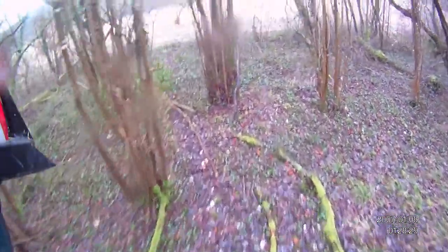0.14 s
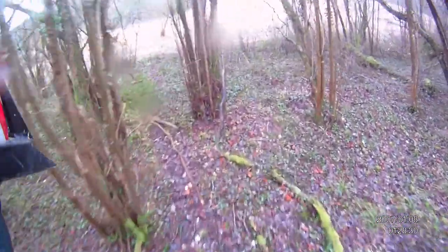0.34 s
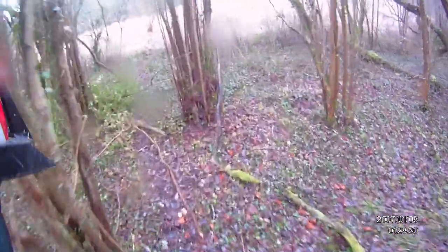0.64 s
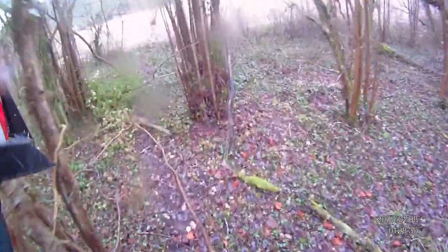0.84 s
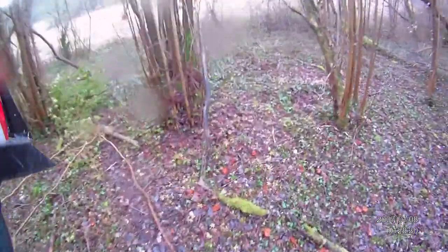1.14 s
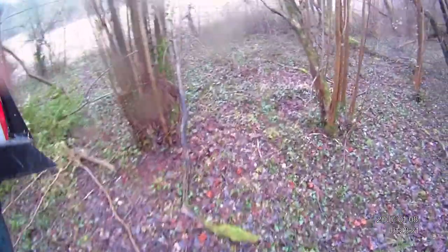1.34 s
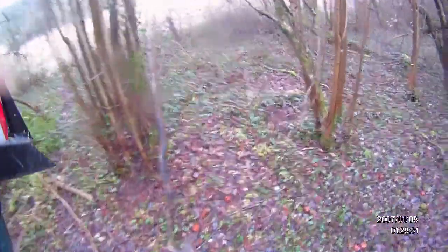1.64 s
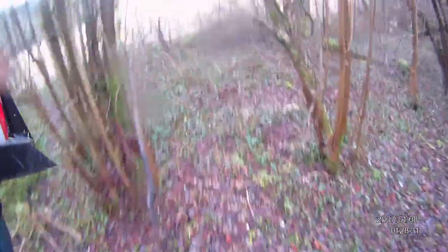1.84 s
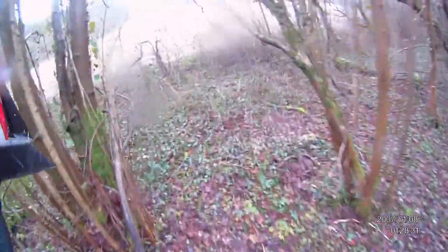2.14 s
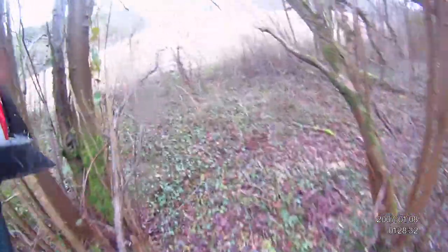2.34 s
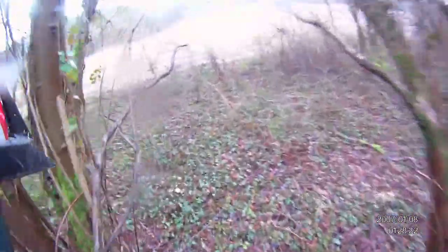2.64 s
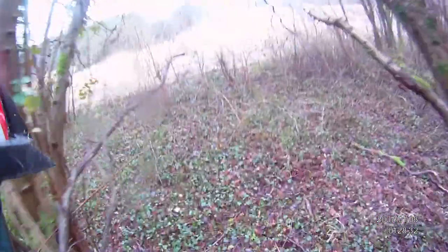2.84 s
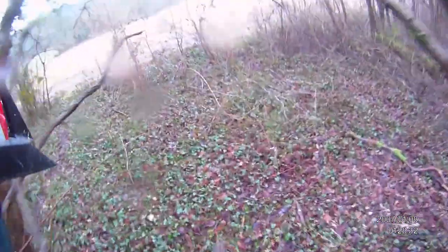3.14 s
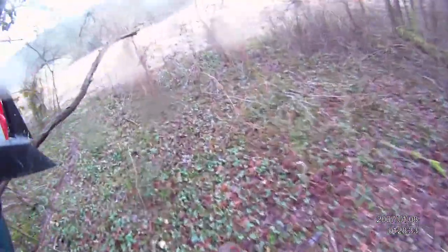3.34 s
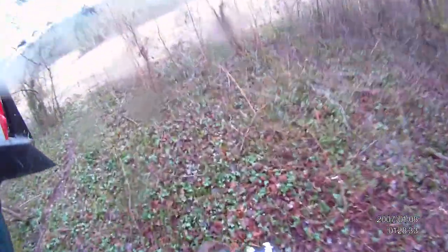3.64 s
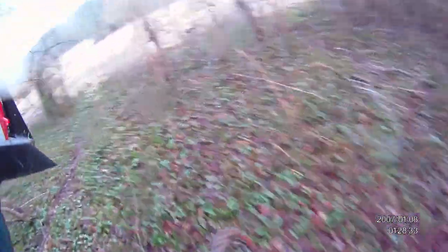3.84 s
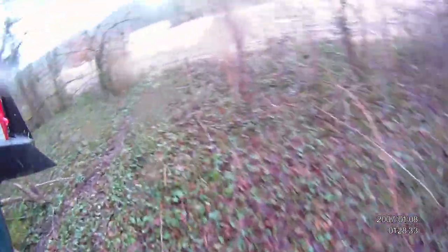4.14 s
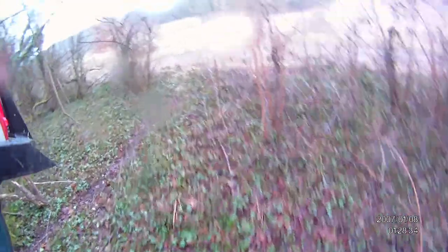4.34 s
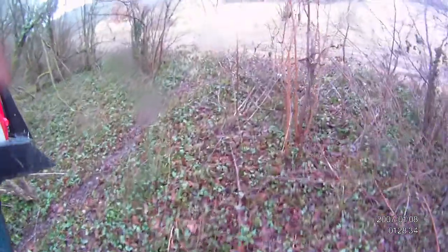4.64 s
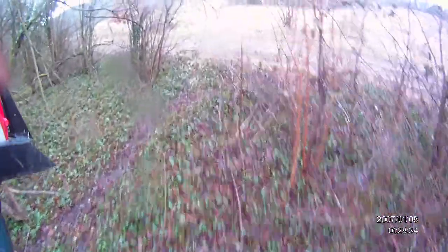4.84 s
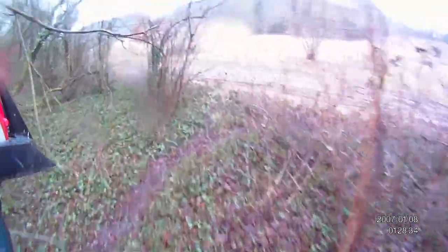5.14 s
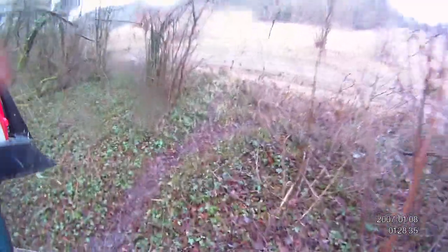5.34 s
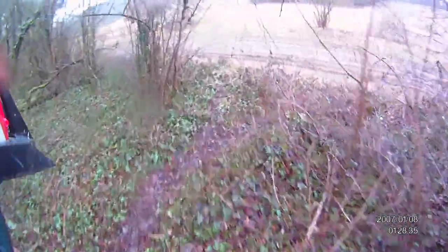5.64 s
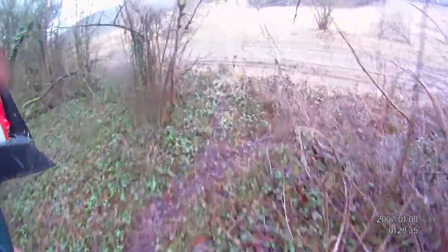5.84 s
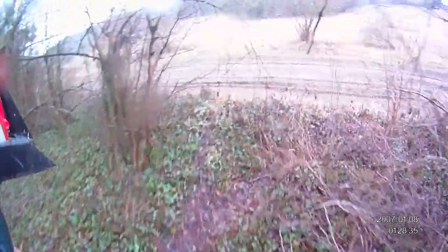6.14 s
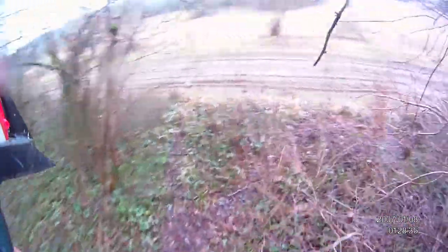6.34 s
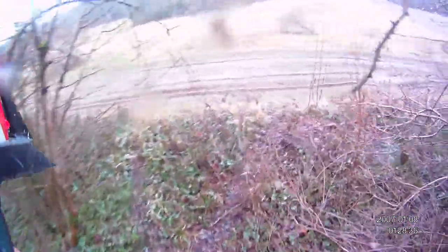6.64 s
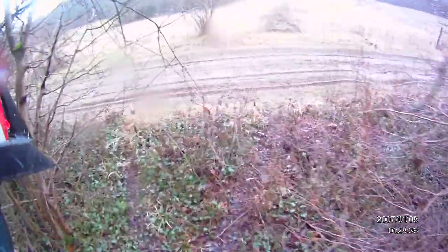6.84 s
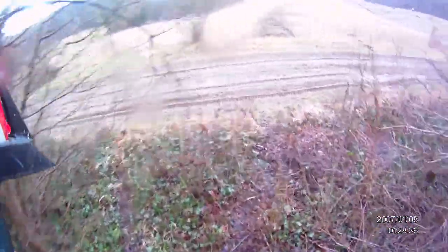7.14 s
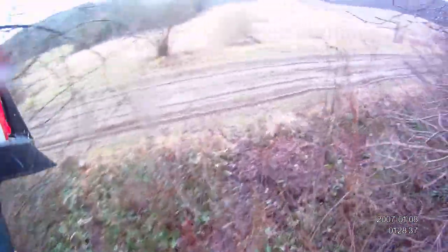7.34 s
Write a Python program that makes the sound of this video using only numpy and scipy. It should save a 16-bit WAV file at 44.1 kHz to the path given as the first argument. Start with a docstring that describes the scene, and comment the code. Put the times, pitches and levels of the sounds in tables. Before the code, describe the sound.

Close and boxy, from a microphone sealed in a small case on a bike: tyres rustle over leaf litter, brittle twigs crack and stems thump the bike. Isolated snaps come first, then a dense bustle of cracking and knocking between roughly two and a half and five and a half seconds, including hard taps on the case. It eases into softer rustling with a few last ticks, with low hiss beneath.

```python
"""Slow bicycle ride through dry brush

A bicycle is ridden slowly through dry woodland brush, heard from a small camera in a closed housing.
Leaves rustle under the tyres as random grains; twigs crack brightly and stems thump the bike as short volleys
of breaking fibres through resonances. A branch raps the housing and jolts ring the frame as decaying modes.
The housing colours rustle, cracks and thumps with a cavity ring and a port ring; hiss and faint whines lie below."""
import sys
import numpy as np
from scipy import signal
from scipy.fft import rfft, irfft
from scipy.io import wavfile

SR = 44100
rng = np.random.default_rng(int(sys.argv[2]) if len(sys.argv) > 2 else 0)


def decibels_to_gain(level_db):
    """Convert a level in decibels to a linear amplitude gain (20 dB per decade)."""
    exponent = np.asarray(level_db, float) / 20
    return 10 ** exponent


def digitize_waveform(pressure):
    """Quantize a signal to 16-bit integers and store it at the path in sys.argv[1].

    Rows of a 2-D input are taken as channels; values are limited to [-1, 1].
    """
    field = np.atleast_2d(pressure).T
    bounded = np.clip(field, -1, 1)
    quanta = np.round(bounded * 32767).astype(np.int16)
    wavfile.write(sys.argv[1], SR, quanta)


N = 330750

# louder twigs cracking close by: t/s, level of the ring's peak/dB, f of the crack/Hz, t60/s,
# level of the dry edge near 10 kHz relative to the ring/dB
TWIG_CRACKS = [(0.0383, -28.5, 4600, 0.0062, -32.5), (0.6917, -6.5, 4420, 0.01, -15),
               (0.8607, -31.5, 3250, 0.012, -23.5), (1.094, -26, 6900, 0.026, -27),
               (1.106, -36, 3310, 0.012, -28), (1.1243, -26.5, 3170, 0.012, -25),
               (1.1407, -29.5, 4740, 0.012, -26), (1.173, -34, 3270, 0.01, -22),
               (1.2068, -28, 5200, 0.0098, -24), (1.3319, -29, 5430, 0.015, -25),
               (1.385, -31, 5870, 0.012, -16), (1.4144, -31.5, 5770, 0.012, -7),
               (1.4265, -26.5, 3520, 0.0098, -31), (1.473, -29, 5150, 0.013, -30),
               (1.8802, -11, 5700, 0.0092, -19.5), (2.1889, -26.5, 4740, 0.0078, -35.5),
               (2.251, -25.5, 4600, 0.0091, -38), (2.3366, -20.5, 6860, 0.015, -20),
               (2.3504, -27, 5100, 0.012, -21), (2.3646, -21.5, 5400, 0.015, -23),
               (2.377, -26, 5840, 0.014, -22.5), (2.4592, -29.5, 5100, 0.015, -23),
               (2.5366, -29, 5400, 0.0091, -29.5), (2.588, -15, 5600, 0.019, -35.5),
               (2.6416, -25.5, 5900, 0.011, -24), (2.7411, -24.5, 5660, 0.01, -16.5),
               (2.7504, -7.5, 6100, 0.017, -40), (2.807, -24, 5540, 0.009, -25.5),
               (2.8634, -10.5, 6240, 0.02, -19.5), (2.9883, -16, 6870, 0.017, -17.5),
               (3.021, -28.5, 5830, 0.018, -26), (3.0312, -22, 5200, 0.011, -25),
               (3.0554, -24.5, 5730, 0.024, -27), (3.1157, -24, 4440, 0.015, -26.5),
               (3.1272, -14.5, 5670, 0.036, -38), (3.3155, -28, 4560, 0.011, -27),
               (3.3903, -31, 5020, 0.011, -30), (3.434, -28, 5770, 0.015, -15),
               (3.456, -28.5, 5750, 0.012, -22), (3.468, -20.5, 6600, 0.025, -17.5),
               (3.5917, -19, 5830, 0.015, -16), (3.685, -18.5, 5830, 0.036, -30),
               (3.7906, -22, 5240, 0.015, -18), (3.8222, -27.5, 5840, 0.017, -12.5),
               (3.87, -23.5, 6030, 0.012, -16.5), (3.92, -23.5, 4730, 0.012, -24),
               (4.0283, -17.5, 5350, 0.012, -16.5), (4.0443, -14.5, 3680, 0.017, -16.5),
               (4.0495, -15.5, 6100, 0.019, -17.5), (4.0947, -23, 5530, 0.022, -29),
               (4.1919, -14, 7550, 0.012, -24.5), (4.2043, -16.5, 5450, 0.011, -21),
               (4.2395, -17.5, 5800, 0.021, -18), (4.252, -22, 3710, 0.021, -22.5),
               (4.263, -15, 5400, 0.022, -24), (4.2722, -14, 5860, 0.036, -22),
               (4.4556, -28, 4570, 0.012, -24), (4.4743, -23.5, 6640, 0.008, -23),
               (4.6307, -15, 5380, 0.011, -21), (4.7353, -17, 6170, 0.0097, -10.5),
               (4.74, -21, 4880, 0.01, -20), (4.757, -24, 4850, 0.022, -23),
               (4.9015, -16, 3900, 0.012, -38), (4.9068, -19.5, 3000, 0.01, -20),
               (5.021, -11.5, 5900, 0.012, -33), (5.0242, -16.5, 3430, 0.012, -22),
               (5.0408, -16.5, 6300, 0.011, -14), (5.0985, -13.5, 5900, 0.016, -10.5),
               (5.1764, -21.5, 5100, 0.014, -20), (5.197, -25, 5840, 0.0088, -8),
               (5.328, -25, 5500, 0.015, -31), (5.3824, -16, 4400, 0.014, -27),
               (5.4085, -27.5, 4470, 0.012, -28.5), (5.5174, -31, 4600, 0.029, -11.5),
               (5.5552, -21.5, 5260, 0.018, -12.5), (5.615, -28.5, 3580, 0.023, -20),
               (5.668, -25, 5970, 0.012, -30), (5.8984, -28.5, 5100, 0.016, -27),
               (5.9883, -28, 4500, 0.013, -18), (6.0197, -17, 4420, 0.01, -28.5),
               (6.1227, -17.5, 4960, 0.008, -20.5), (6.2235, -26, 4880, 0.014, -18),
               (6.8324, -34, 5360, 0.036, -8.5), (6.8842, -23, 7060, 0.0092, -27.5),
               (7.3543, -27.5, 5910, 0.02, -26)]
# louder stems thumping the bike: t/s, level of the ring's peak/dB, f of the stem/Hz,
# level of the body under 900 Hz relative to the ring/dB
STEM_THUMPS = [(0.218, -32.5, 1480, -25), (0.404, -36, 1330, -28), (0.691, -23, 1430, -22),
               (0.729, -33, 1240, -24), (0.76, -30.5, 1290, -25), (0.862, -27, 1170, -19.5),
               (1.094, -25, 3030, -34), (1.1, -29, 1360, -20), (1.159, -31, 2700, -25),
               (1.168, -33, 3180, -36), (1.386, -32.5, 1320, -35), (1.427, -36.5, 1470, -29),
               (1.473, -33, 1300, -21), (1.663, -30, 1410, -19.5), (1.701, -27.5, 1340, -20),
               (1.879, -27, 1200, -19.5), (1.992, -33.5, 1250, -37), (2.251, -26.5, 1280, -39),
               (2.375, -26.5, 2010, -30), (2.491, -31.5, 2040, -34), (2.586, -32.5, 1320, -36),
               (2.742, -34, 3200, -14.5), (2.751, -17.5, 1360, -31.5), (2.773, -35.5, 1390, -27),
               (2.864, -26.5, 1060, -33), (2.883, -30.5, 2030, -24.5), (2.988, -24, 1210, -19.5),
               (3.055, -29, 1720, -21), (3.116, -27, 1700, -16.5), (3.128, -25, 3200, -6),
               (3.136, -23.5, 1220, -31.5), (3.212, -34, 1250, -22.5), (3.266, -36, 2760, -22.5),
               (3.392, -39, 1340, -19), (3.433, -33.5, 1410, -12), (3.448, -27, 1200, -17),
               (3.455, -24, 1170, -28), (3.463, -27, 1840, -23.5), (3.591, -29, 1390, -22.5),
               (3.686, -21.5, 1200, -23), (3.713, -31, 1220, -22.5), (3.869, -30, 1290, -33),
               (3.885, -30, 1320, -37), (3.987, -28, 1350, -30), (4.049, -20.5, 2200, -25),
               (4.096, -20, 1530, -23), (4.202, -23.5, 1320, -27), (4.239, -24, 1260, -18.5),
               (4.255, -17.5, 1320, -22.5), (4.275, -21.5, 1250, -28.5), (4.296, -23, 1460, -22),
               (4.439, -25.5, 1350, -37.5), (4.455, -29, 2300, -30.5), (4.605, -29, 1300, -25),
               (4.63, -24, 1260, -21), (5.175, -24, 1160, -22), (5.329, -32, 1280, -26.5),
               (5.383, -25.5, 3000, -42), (5.668, -24.5, 1280, -34), (5.769, -40, 1200, -12.5),
               (6.123, -23.5, 970, -24), (6.223, -33.5, 1280, -32), (6.812, -32.5, 1720, -30.5),
               (6.942, -30.5, 1270, -15), (7.016, -33, 1280, -22), (7.191, -33, 1270, -39),
               (7.198, -28, 2350, -38), (7.388, -34, 1360, -24)]


def rms_one(x):
    """Scaled to rms 1."""
    return x / np.sqrt(np.mean(x ** 2) + 1e-20)


def peak_one(x):
    """Scaled to peak 1."""
    return x / (np.max(np.abs(x)) + 1e-12)


def band(x, low_hz, high_hz):
    """Butterworth band-pass."""
    return signal.sosfilt(signal.butter(2, [low_hz, high_hz], "band", fs=SR, output="sos"), x)


def resonance(x, hz, width_hz):
    """Two-pole resonance, gain about 1 at its top."""
    r = np.exp(-np.pi * width_hz / SR)
    top = (1 - r * r) / 2
    return signal.lfilter([top, 0, -top], [1, -2 * r * np.cos(2 * np.pi * hz / SR), r * r], x)


def mode(blows, hz, t60):
    """A ringing mode: a unit click starts a decaying sine of height 1."""
    r = decibels_to_gain(-60 / (t60 * SR))
    w = 2 * np.pi * hz / SR
    return signal.lfilter([0, np.sin(w)], [1, -2 * r * np.cos(w), r * r], blows + 1e-18)


def housing(x):
    """The closed housing round the microphone: parallel resonances of alternating sign."""
    # cavity, port and further resonances: f/Hz, width/Hz, level/dB
    housing_rings = [(1320, 343, 1.5), (2110, 33, -4), (2560, 1500, -16), (5150, 1235, 1),
                     (6900, 2150, -4.5)]
    out = 0
    for k, (hz, width_hz, db) in enumerate(housing_rings):
        out = out + decibels_to_gain(db) * (-1) ** k * resonance(x, hz, width_hz)
    return out


def drift(rate_hz):
    """Slow random wander of rms about 1: noise through two equal low-pass poles."""
    step = 40  # samples between drawn points
    r = np.exp(-2 * np.pi * rate_hz * step / SR)
    noise = rng.standard_normal(N // step + 2002)
    slow = signal.lfilter([1], [1, -2 * r, r * r], noise)[2000:]
    return np.interp(np.arange(N) / step, np.arange(len(slow)), rms_one(slow))


def grains(size, per_s, spread_db):
    """Random clicks of either sign; with a spread, mostly small ones and a few large."""
    sizes = decibels_to_gain(spread_db * np.minimum(rng.exponential(1, size), 5)) * rng.choice([-1, 1], size)
    return sizes * (rng.random(size) < per_s / SR) + 1e-18


def tearing(t60, per_s, tail_db, first):
    """Fibres part in a quick volley after a strong first break; a weaker, four times longer settling follows."""
    t = np.arange(4000) / SR
    t60 = max(t60, 0.003)
    volley = grains(4000, per_s, spread_db=3.5)
    volley[0] = first
    return volley * (decibels_to_gain(-60 * t / t60) + decibels_to_gain(tail_db - 15 * t / t60))


def place(out_size, events):
    """Adds each short sound at its time."""
    out = np.zeros(out_size + 4000)
    for s, sound in events:
        at = round(s * SR)
        out[at:at + len(sound)] += sound
    return out[:out_size]


def stirred(breaks):
    """Every break shakes the leaves round it: a rustle level that rises softly and dies away."""
    stir_db, t60_s, rise_s = -27.5, 0.14, 0.012  # stir_db: relative to the break's peak
    s, peak_db = np.array(breaks)[:, :2].T
    shakes = np.zeros(N)
    shakes[(s * SR).astype(int)] = decibels_to_gain(peak_db + stir_db) ** 2
    fall = decibels_to_gain(-120 / (t60_s * SR))  # on power, so doubled in dB
    rise = np.exp(-1 / (rise_s * SR))
    power = signal.lfilter([1 - rise], np.convolve([1, -fall], [1, -rise]), shakes + 1e-18)
    return np.sqrt(power)


def rustle_db():
    """Levels of the dull and the bright rustle in time: the tyres, plus leaves shaken by the louder breaks."""
    # leaves under the tyres: t/s, level in the cavity band/dB, level in the port band/dB
    tyre_levels = [(0.0, -53.5, -53.5), (0.73, -50.5, -52.5), (1.04, -56, -54.5), (1.38, -54, -53.5),
                   (1.77, -50.5, -51.5), (2.0, -60.5, -53.5), (2.21, -58.5, -55.5), (2.4, -53.5, -50.5),
                   (2.92, -50, -49), (3.32, -54, -51.5), (3.65, -51, -54), (3.89, -48, -46),
                   (4.11, -47.5, -43.5), (4.39, -50, -48), (4.93, -48.5, -43.5), (5.18, -51, -48.5),
                   (5.56, -49.5, -46.5), (5.7, -51.5, -49), (6.16, -53, -48.5), (6.58, -58, -52.5),
                   (7.23, -55.5, -52), (7.5, -53, -52)]
    s, dull_db, bright_db = np.transpose(tyre_levels)
    t = np.arange(N) / SR
    dull = np.hypot(decibels_to_gain(np.interp(t, s, dull_db)), decibels_to_gain(3) * stirred(STEM_THUMPS))
    bright = np.hypot(decibels_to_gain(np.interp(t, s, bright_db)), decibels_to_gain(-5) * stirred(TWIG_CRACKS))
    return 20 * np.log10(dull), 20 * np.log10(bright)


def small_breaks(thick_db, level_db, hz_range, colour, luck):
    """Rows for small chance breaks, oftener and louder where the rustle is thick."""
    spread_db, follows = 7, 0.8  # follows: dB per dB of rustle
    swing_db = thick_db - thick_db.mean()
    share = np.cumsum(decibels_to_gain(swing_db) ** 2)
    at = np.searchsorted(share / share[-1], luck[:, 0])
    db = level_db + follows * swing_db[at] - spread_db * luck[:, 1]
    hz = hz_range[0] * (hz_range[1] / hz_range[0]) ** luck[:, 2]
    return [(a / SR, d, f, *colour) for a, d, f in zip(at, db, hz)]


def electronics():
    """Steady coloured hiss and two close, faint whines whose levels waver."""
    # colour of the hiss: f/Hz, relative level per Hz/dB
    hiss_colour = [(12, -57), (20, -34), (64, -47), (140, -20), (424, -6), (1090, 2.5), (1290, 0.5),
                   (2430, -1.5), (5920, -13.5), (8490, -12), (15200, -12)]
    # whines: f/Hz, rms level about which each wavers/dB
    whine_tones = [(7837, -77.5), (7897, -69.5)]
    hz = np.fft.rfftfreq(N, 1 / SR) + 1  # +1 keeps the logarithm finite
    points = np.array(hiss_colour)
    colour_db = np.interp(np.log(hz), np.log(points[:, 0]), points[:, 1])
    colour = decibels_to_gain(colour_db) * (hz < 15300)
    hiss = rms_one(irfft(rfft(rng.standard_normal(N)) * colour, N))
    t = np.arange(N) / SR
    whine = np.zeros(N)
    for f, db in whine_tones:
        whine += np.sqrt(2) * decibels_to_gain(db + 0.99 * drift(12.0)) * np.sin(2 * np.pi * f * t)
    return decibels_to_gain(-58) * hiss + whine


def frame():
    """Jolts set the low modes of the frame ringing; the uneven ground rumbles without pitch."""
    # jolts of the frame: t/s, level/dB, extra level on the lowest mode/dB
    frame_jolts = [(1.657, -60, 2), (1.703, -51.5, 11.5), (1.742, -65, 3), (4.899, -62, -11.5),
                   (5.022, -58, -4), (5.16, -51, -3.5)]
    # modes of the frame: f/Hz, relative level/dB, t60/s
    frame_modes = [(58.8, -9, 0.48), (86, 1.5, 0.12), (193, 8.5, 0.059)]
    s, level_db, deep_db = np.transpose(frame_jolts)
    at = np.round(s * SR).astype(int)
    out = np.zeros(N)
    for hz, db, t60 in frame_modes:
        blows = np.zeros(N)
        blows[at] = decibels_to_gain(level_db + db + deep_db * (hz < 70))
        out += mode(blows, hz, t60)
    rumble = rms_one(band(rng.standard_normal(N), 23, 137))
    rumble *= decibels_to_gain(-81.5 + 3 * drift(5.1))
    return band(out, 56, 440) + rumble


def raps():
    """A branch bounces on the housing: every bounce strikes all shell modes, harder ones the upper modes more."""
    # bounces, in three raps: t/s, relative level/dB, hardness as extra level on modes above 1600 Hz/dB
    branch_bounces = [(4.9014, -18.5, 14.5), (4.9030, -8.5, -3), (4.9068, -16, -14), (4.9078, -25, 17),
                      (5.0209, -19, 9), (5.0250, -13, 3.5), (5.0287, -19, 9), (5.1569, -23.5, -5.5),
                      (5.159, -34, -8)]
    # modes of the shell: f/Hz, relative level/dB, t60/s
    shell_modes = [(540, -30, 0.056), (678, -29.5, 0.069), (850, -31, 0.039), (1280, -37, 0.062),
                   (1339, -0.5, .018), (1430, 0, 0.02), (1840, -7.5, 0.011), (2100, -11.5, 0.01),
                   (2285, 2, 0.0061), (2444, -13, 0.012), (3000, -20, 0.0095), (3560, -18.5, 0.0058)]
    s, level_db, hard_db = np.transpose(branch_bounces)
    at = np.round(s * SR).astype(int)
    out = np.zeros(N)
    for hz, db, t60 in shell_modes:
        blows = np.zeros(N)
        uneven_db = rng.normal(0, 1, len(at))
        blows[at] = decibels_to_gain(level_db + db + hard_db * (hz > 1600) + uneven_db)
        ring = mode(blows, hz, t60)
        out += resonance(resonance(ring, hz, 340), hz, 340)  # each mode takes a millisecond to build up
    return decibels_to_gain(7.5) * out


def leaf_snaps(per_s):
    """Single leaves snap, each with one of eight broad colours and a ragged few milliseconds of tearing."""
    starts = grains(N, per_s * decibels_to_gain(4 * drift(4.1)), spread_db=5.5)
    starts = np.abs(np.clip(starts, -7, 7))
    dealt = rng.integers(0, 8, N)  # which colour a snap gets
    ragged = grains(N, per_s=2600, spread_db=6.5)
    out = np.zeros(N)
    for k, hz in enumerate(np.geomspace(900, 8000, 8)):
        dying = signal.lfilter([1], [1, -0.991], starts * (dealt == k) + 1e-18)
        out += resonance(dying * ragged, hz, 1.1 * hz)
    return housing(out)


def rustle():
    """Dense leaf grains that come in clumps, dull ones and bright ones, with lone snaps."""
    cavity_db, port_db = rustle_db()
    clumps = drift(22.0)
    dull = housing(grains(N, 2500 * decibels_to_gain(1.8 * clumps), spread_db=4.0))
    bright = housing(grains(N, 4000 * decibels_to_gain(1.6 * clumps), spread_db=0.0))
    snaps = rms_one(leaf_snaps(per_s=240))
    dull = rms_one(dull) + 0.57 * snaps
    bright = rms_one(bright) + 0.93 * snaps
    swell = drift(1.06)
    flicker = drift(40.0)
    dull = rms_one(band(dull, 164, 3160)) * decibels_to_gain(cavity_db + 3.3 * swell)
    bright = rms_one(band(bright, 2850, 13800)) * decibels_to_gain(port_db + 2.0 * flicker + 0.3 * swell)
    return dull + bright


def thumps(luck):
    """Each stem rings at its own pitch and in the cavity, with a soft push below."""
    small = small_breaks(rustle_db()[1], level_db=-38, hz_range=(1200, 2520), colour=(-17.5,), luck=luck)
    sounds = []
    for s, peak_db, hz, body_db in STEM_THUMPS + small:
        # higher-pitched stems die a little sooner; each one varies
        t60 = 0.025 * (1300 / hz) ** 0.1 * decibels_to_gain(1.5 * rng.standard_normal())
        volley = tearing(t60, per_s=5600, tail_db=-18.5, first=2.45)
        ring = peak_one(band(0.31 * housing(volley) + resonance(volley, hz, 0.15 * hz), 527, 4170))
        body = peak_one(band(band(volley, 315, 690), 140, 720))
        sounds.append((s, decibels_to_gain(peak_db) * (ring + decibels_to_gain(body_db) * body)))
    return place(N, sounds)


def cracks(luck):
    """Each twig rings briefly at its own pitch and through the port, with a dry edge on top."""
    small = small_breaks(rustle_db()[1], level_db=-34, hz_range=(3300, 6650), colour=(0.0073, -15), luck=luck)
    sounds = []
    for s, peak_db, hz, t60, edge_db in TWIG_CRACKS + small:
        volley = tearing(t60, per_s=9800, tail_db=-13.5, first=6)
        ring = peak_one(band(housing(volley) + 0.93 * resonance(volley, hz, 860), 2420, 7050))
        edge = peak_one(resonance(band(volley, 8500, 12900), 9800, 1660))
        sounds.append((s, decibels_to_gain(peak_db) * (ring + decibels_to_gain(edge_db) * edge)))
    return place(N, sounds)


def scene():
    """All sources, one channel; most small twigs that crack also thump."""
    luck = rng.random((70, 3))  # for each small break: time, level, pitch
    brush = rustle() + cracks(luck) + thumps(luck[:45])
    return (brush + raps() + frame() + electronics())[None]


def band_limit(x):
    """A steep low-pass at the top of the band."""
    return signal.sosfilt(signal.butter(12, 16510, fs=SR, output="sos"), x)


def record(dry):
    """The loudest peaks are rounded and the top is cut steeply."""
    rounded = 1.227 * np.tanh(dry / 1.174)
    cut = signal.cheby2(14, 70, 16600, fs=SR, output="sos")
    mix = signal.sosfilt(cut, rounded)
    return band_limit(mix)


dry = scene()
out = record(dry)
digitize_waveform(out)
```